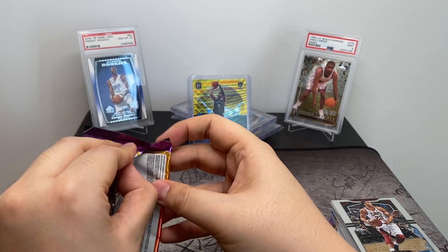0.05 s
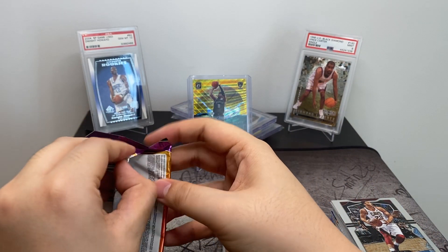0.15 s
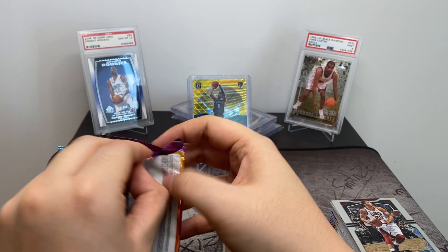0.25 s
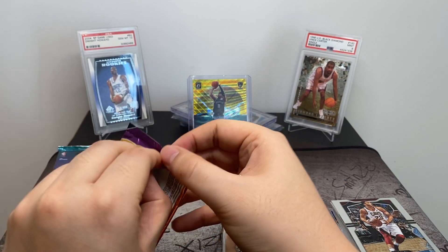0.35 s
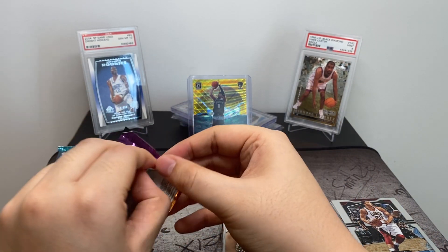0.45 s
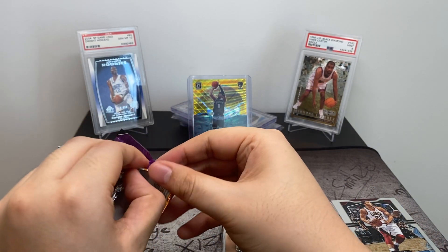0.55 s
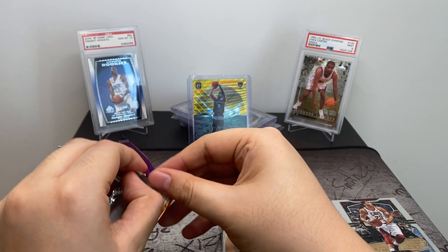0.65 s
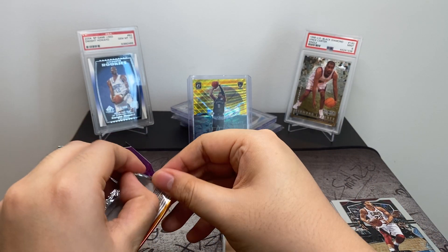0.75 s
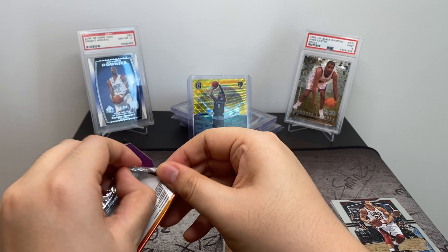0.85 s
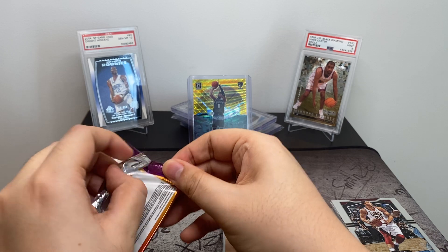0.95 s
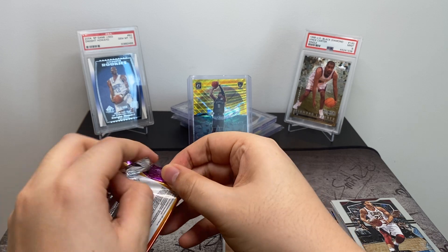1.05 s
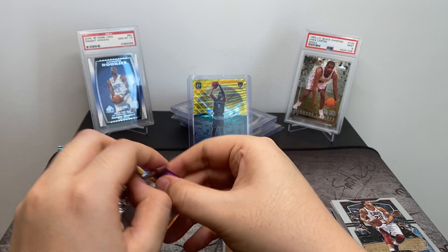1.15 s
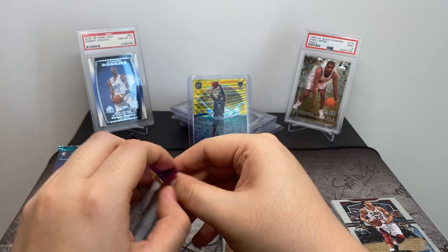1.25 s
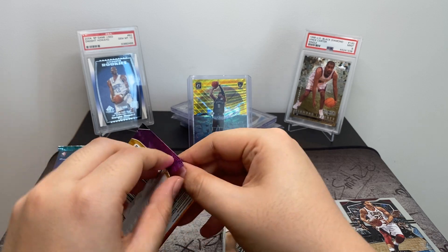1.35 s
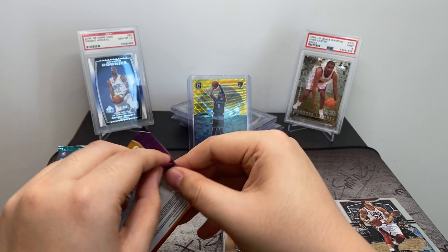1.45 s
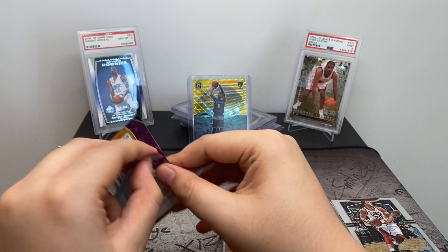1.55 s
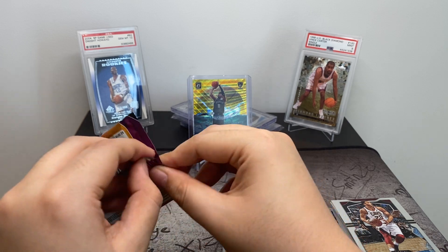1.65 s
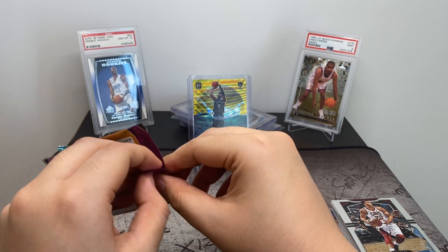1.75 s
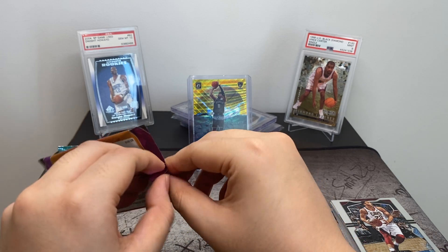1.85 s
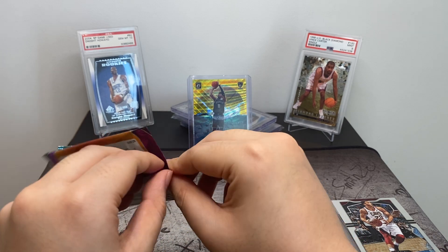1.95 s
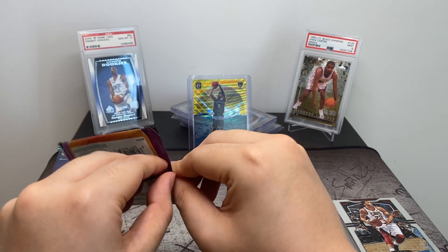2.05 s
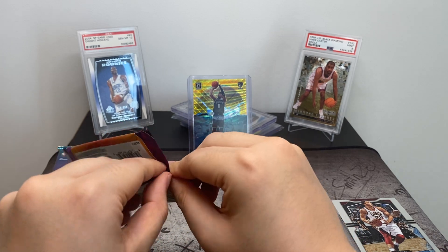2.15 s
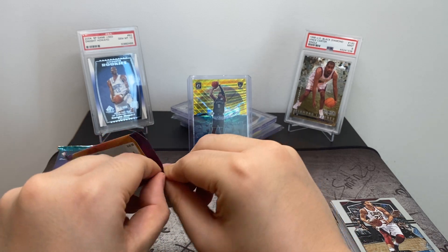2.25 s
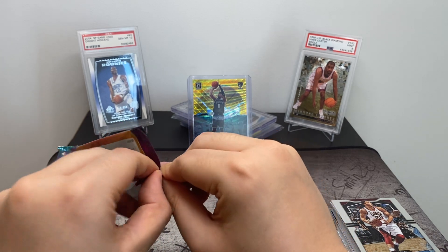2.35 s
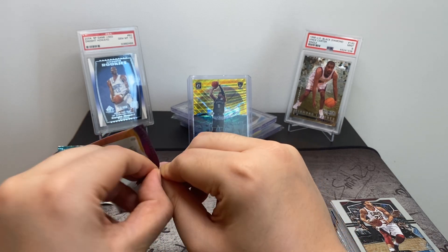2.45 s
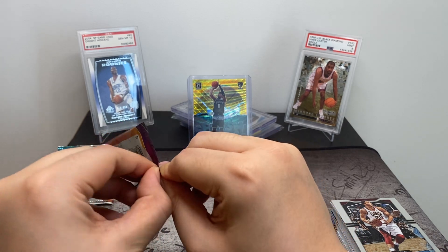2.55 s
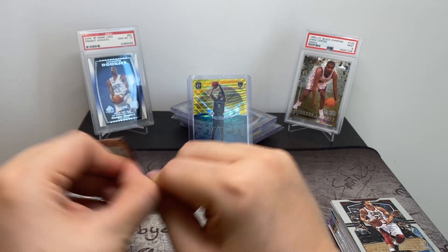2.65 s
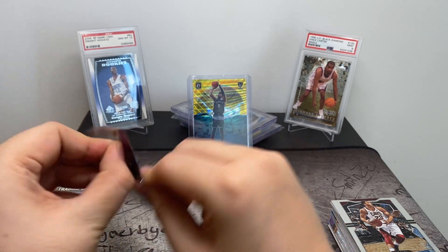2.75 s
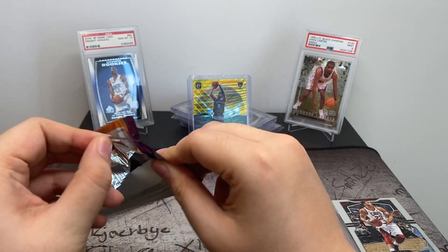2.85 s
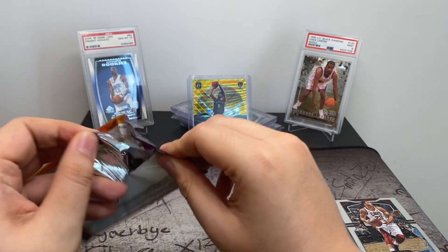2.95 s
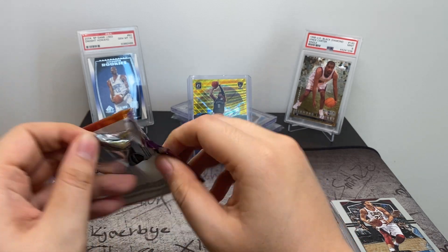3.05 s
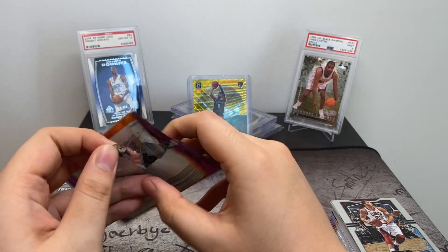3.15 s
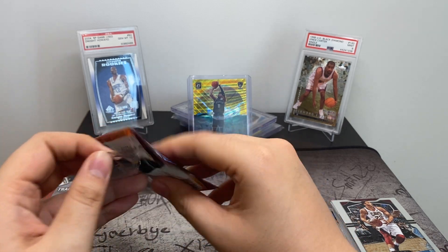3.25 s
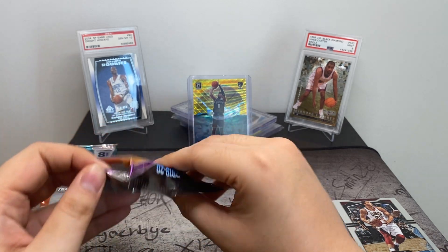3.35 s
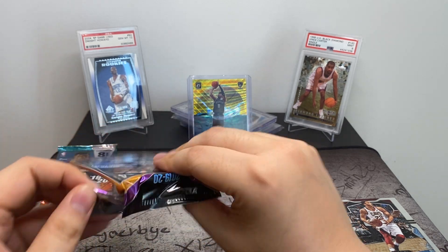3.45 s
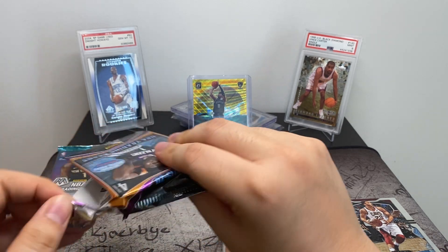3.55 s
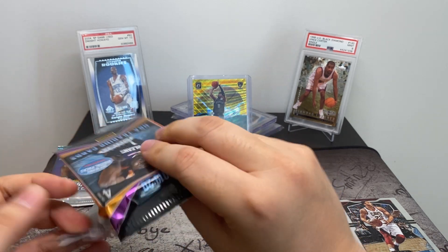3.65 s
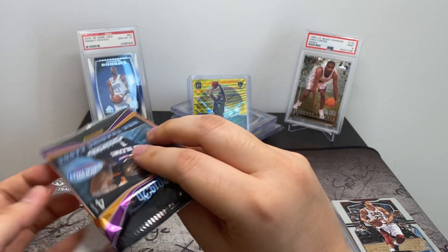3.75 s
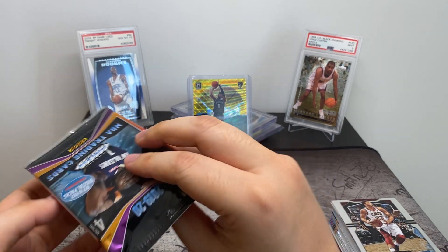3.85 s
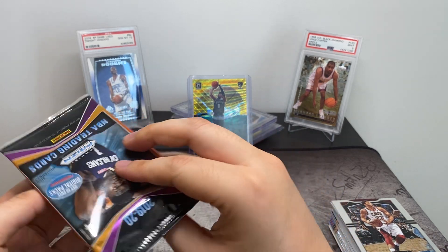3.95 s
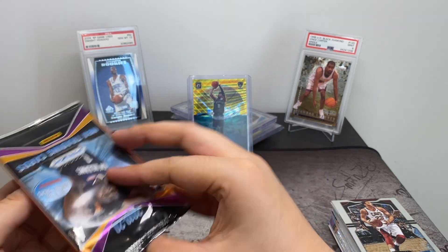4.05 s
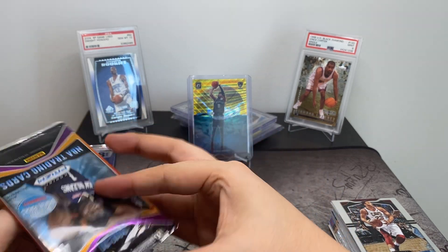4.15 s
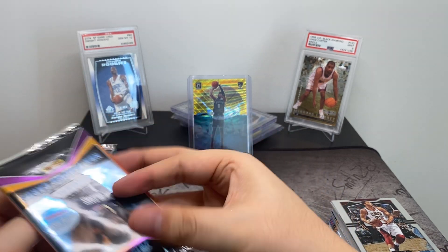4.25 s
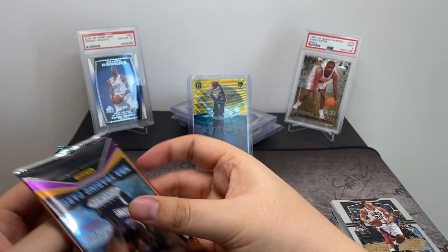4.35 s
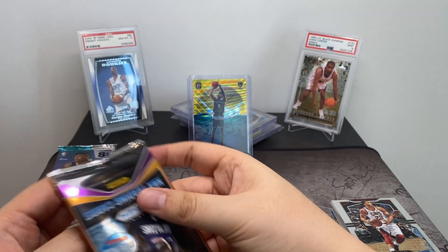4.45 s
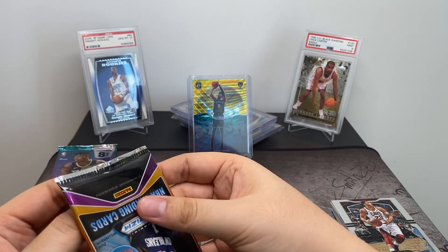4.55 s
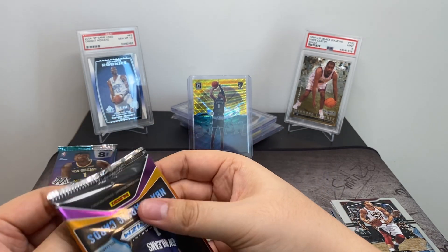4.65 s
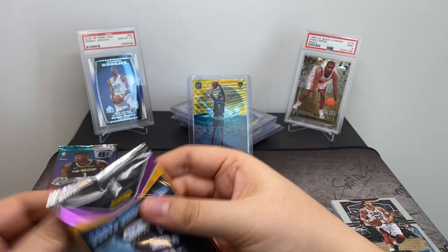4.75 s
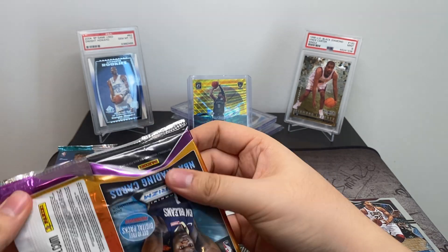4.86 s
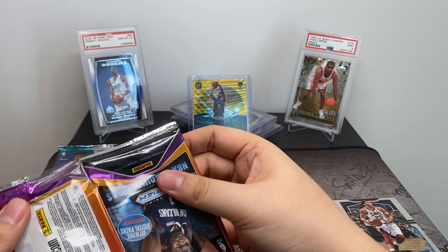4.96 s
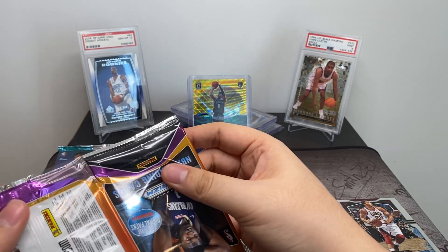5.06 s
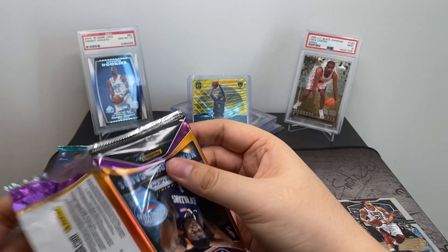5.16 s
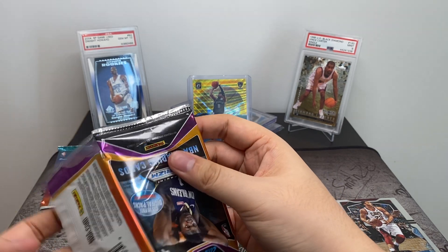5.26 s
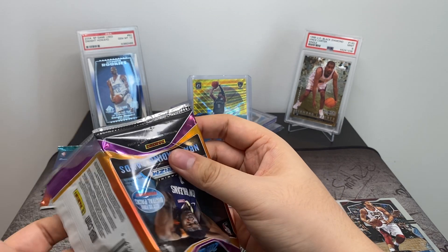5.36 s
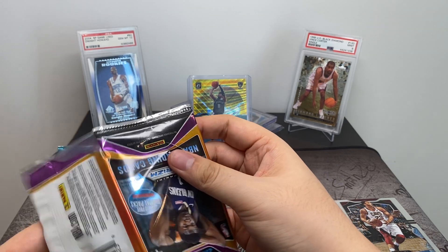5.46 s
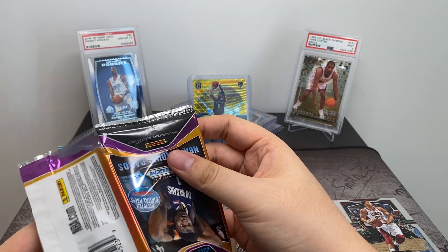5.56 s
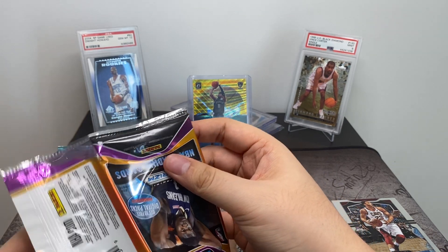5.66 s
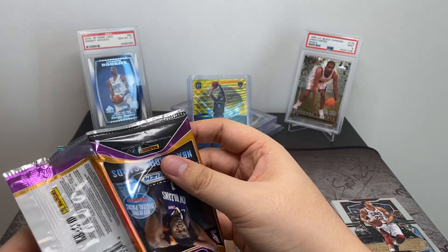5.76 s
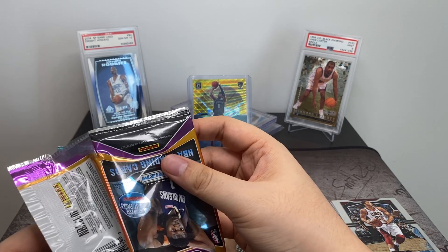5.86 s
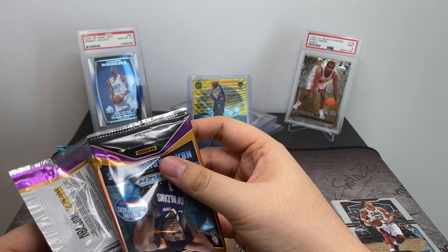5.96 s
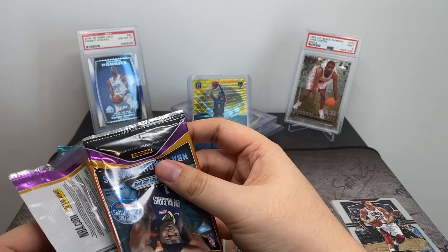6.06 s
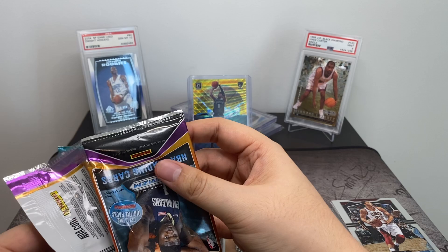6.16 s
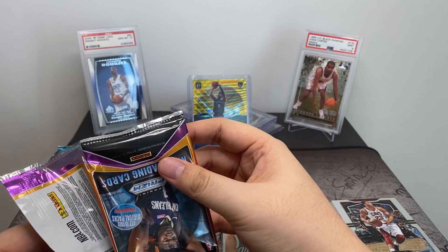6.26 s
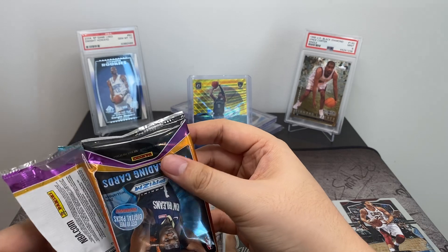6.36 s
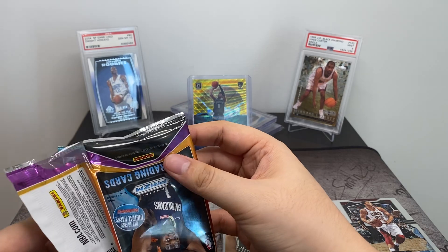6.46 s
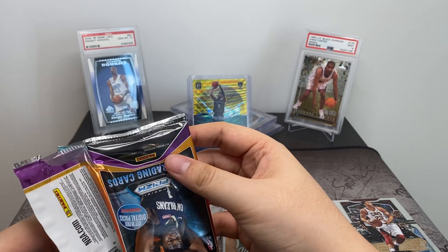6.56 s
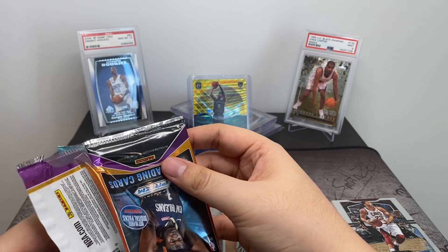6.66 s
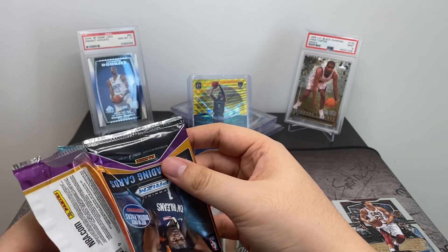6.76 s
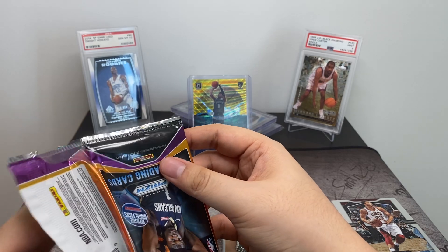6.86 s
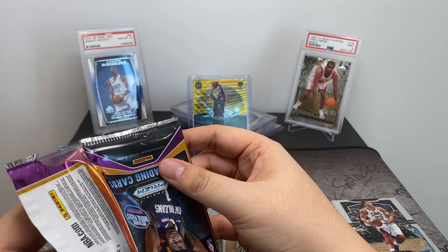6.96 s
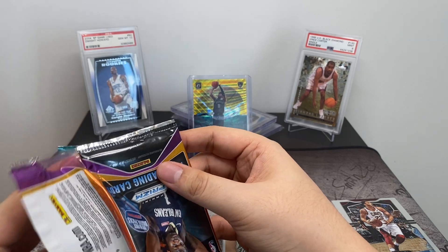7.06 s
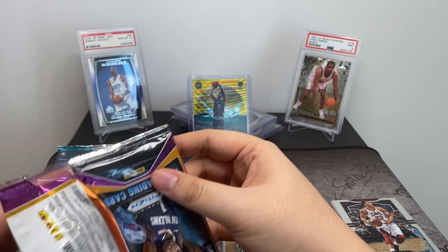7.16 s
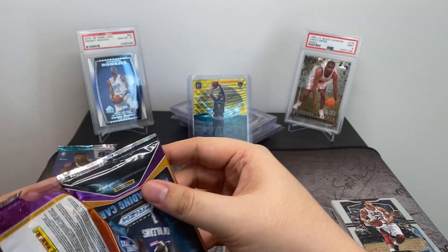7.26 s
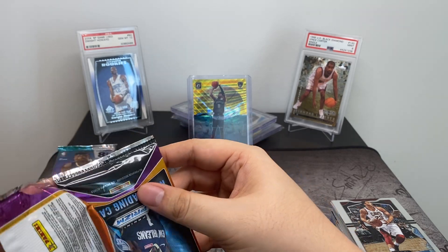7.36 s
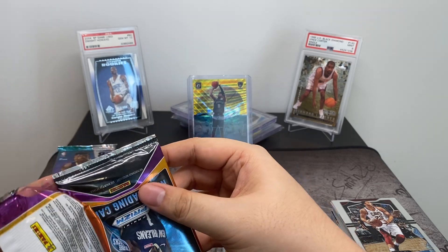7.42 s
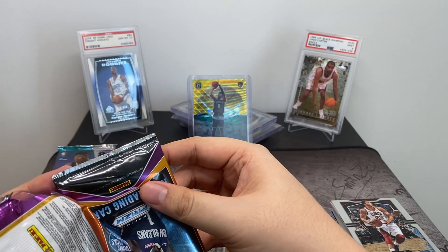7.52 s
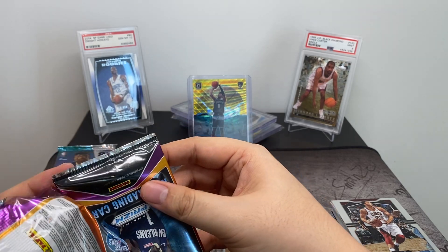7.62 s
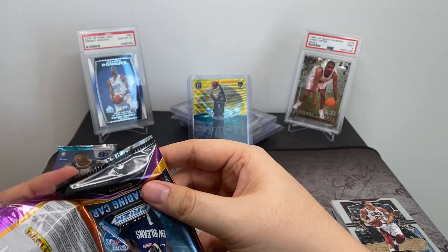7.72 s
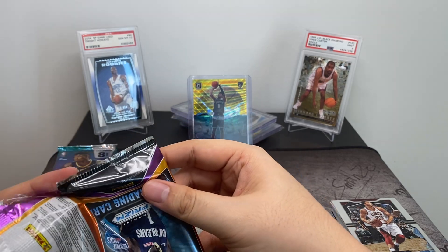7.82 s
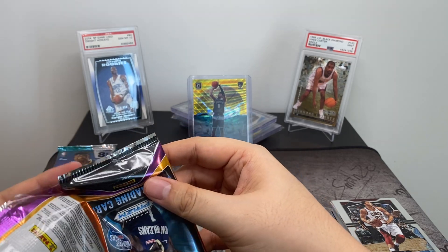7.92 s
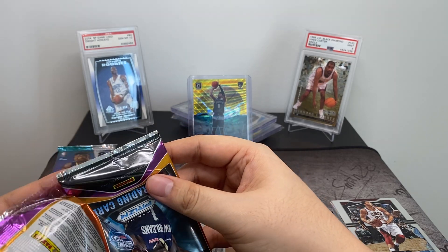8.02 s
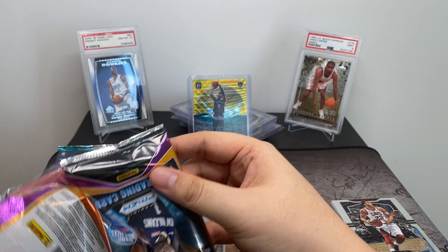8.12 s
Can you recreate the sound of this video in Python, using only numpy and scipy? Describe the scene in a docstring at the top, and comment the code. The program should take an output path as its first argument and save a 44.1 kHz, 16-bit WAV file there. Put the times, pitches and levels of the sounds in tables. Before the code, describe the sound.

Close foil packet crackling in uneven bursts, with sharp crease snaps, short bright seam rips, dull panel pops and soft thumps in a quiet room.

```python
"""A faint crackle over quiet air and a low hum, then creases snapping: hands open a foil card pack, close by.
Each stroke of the fingers sets off clumps of tiny coloured clicks; larger creases snap one by one.
The seam rips in fast runs of bright breaks, fingertips hiss along the foil and broad panels pop dully.
The pouch's resonances give a hollow body, and low damped swings thump softly from 4.9 s on.
The walls add a short diffuse tail to the foil; the stereo ports hear it at different levels and phases."""
import sys
import numpy as np
from scipy import signal
from scipy.fft import rfft, irfft, next_fast_len
from scipy.io import wavfile
from scipy.ndimage import uniform_filter1d, map_coordinates

SR = 44100
rng = np.random.default_rng(int(sys.argv[2]) if len(sys.argv) > 2 else 0)


def pcm_store(signal):
    """Save signal as 16-bit PCM."""
    levels = np.round(np.clip(np.atleast_2d(signal), -1, 1) * 32767)
    wavfile.write(sys.argv[1], SR, levels.astype(np.int16).T)


N = 361179

# fingers sliding smoothly on the foil: start_s, length_s, level_db (hiss at the top of the swell)
FINGER_SLIDES = [(4.135, 0.075, -44.5), (6.602, 0.092, -49.5), (6.616, .016, -50), (6.753, 0.025, -50.5),
                 (6.894, .07, -53)]
# the two ports hear the foil through different paths: freq_hz, left_lead_rad
PORT_PHASE = [(200, 0), (1700, 2), (3000, 4), (4600, 5.5), (6700, 7), (8000, 4), (10500, 0.06),
              (13200, -2.5), (15700, -9)]


def amp(db):
    """Decibels to gain."""
    return 10 ** (np.asarray(db) / 20)


def unit(x):
    """Scales to rms 1."""
    return x / np.sqrt(np.mean(x ** 2) + 1e-20)


def read(points, hz):
    """Reads a spectrum table on a log-frequency axis."""
    f, value = np.transpose(points)
    return np.interp(np.log(hz + 1), np.log(f), value)


def add(mix, s, sound):
    """Adds a sound to the mix at time s."""
    part = mix[:, max(round(s * SR), 0):][:, :sound.shape[-1]]
    part += sound[..., :part.shape[-1]]


def causal(gain):
    """Gives a magnitude curve the phase of a body that rings only after it is struck."""
    log_gain = np.log(np.maximum(np.r_[gain, gain[-2:0:-1]], 1e-4))
    return np.exp(np.conj(signal.hilbert(log_gain)))[:len(gain)]


def port_paths(hz):
    """Phase turns from the foil to the left and right ports; the right one is the reference."""
    return np.exp(1j * read(PORT_PHASE, hz) * np.array([[1], [0]]))


def background(mono_hz=450, hum_hz=52.8, hum_width_hz=6, whine_hz=908, whine_width_hz=25,
               air_db=-53, hum_db=-60, whine_db=-79):
    """Steady room air, alike in both ports in the bass, with a wavering low hum and a faint whine."""
    # colour of the room air: freq_hz, relative_db
    air_colour = [(27, -47.5), (40, -14.5), (60, 0.5), (90, -19.5), (130, -15), (600, -38), (930, -31.5),
                  (1250, -42), (1900, -49.5), (16000, -63.5)]
    hz = np.fft.rfftfreq(N, 1 / SR)
    shared, left, right, drone = rfft(rng.standard_normal((4, N)))
    same = 1 / (1 + (hz / mono_hz) ** 2)
    stereo = np.sqrt(same) * shared + np.sqrt(1 - same) * np.array([left, right])
    air = irfft(stereo * amp(read(air_colour, hz)), N)
    # noise in a narrow band wavers by itself
    hum = irfft(drone / (1 + ((hz - hum_hz) / hum_width_hz) ** 2) ** 2, N)
    whine = irfft(drone / (1 + ((hz - whine_hz) / whine_width_hz) ** 2) ** 2, N)
    return amp(air_db) * unit(air) + amp(hum_db) * unit(hum) + amp(whine_db) * unit(whine)


def room(x, tail_db=-10, slope_db=-2.0, build_s=0.0081):
    """A diffuse tail builds up from the walls, weaker in the treble."""
    # room decay: freq_hz, t60_s
    decay = [(300, 0.18), (4000, 0.28), (15000, 0.21)]
    hz, t, z = signal.stft(rng.standard_normal((2, SR // 2)), SR, nperseg=256)
    z = z * amp(-60 * t / read(decay, hz)[:, None]) * (1 - np.exp(-t / build_s))
    wet = amp(tail_db + slope_db * np.log2(1 + hz / 2000))[:, None]
    flat, tail = signal.istft(np.array([z, z * wet]), SR)[1]
    # the unattenuated tail sets the scale, so wet is relative to the direct sound
    tail = tail / np.linalg.norm(flat[0])
    return x + signal.oaconvolve(x, tail, axes=1)[:, :N]


def thumps(swell_s=.014):
    """The stack of cards shifts in the pouch: a few low, quickly damped swings."""
    # soft thumps: start_s, level_db (envelope peak), pitch_hz
    card_shifts = [(4.902, -36, 81), (5.235, -36.5, 89.5), (5.29, -33, 116), (5.486, -39.5, 116),
                   (5.529, -39.5, 96)]
    out, t = np.zeros((2, N)), np.arange(SR // 4) / SR
    swell = (t / swell_s * np.exp(1 - t / swell_s)) ** 2
    for s, db, hz in card_shifts:
        add(out, s, amp(db) * swell * np.sin(2 * np.pi * hz * t))
    return out


def foil_bands(low_hz=1450, high_hz=7000, size=2048):
    """Impulse responses of the foil, with the pouch's resonances on its colour: hollow body, mids and treble."""
    # colour of the foil: freq_hz, relative_db
    foil_colour = [(50, -29.5), (210, -1), (340, -2.5), (700, -2.5), (3000, 6.5), (5000, 5), (9500, 4.5),
                   (13400, -5), (15200, -4), (17000, -16.5)]
    # resonances of the pouch over the table: freq_hz, width_hz, boost_db
    pouch_modes = [(339, 180, 5.5), (657, 116, 6.5), (1007, 370, 8), (2290, 510, 3.5)]
    hz = np.fft.rfftfreq(size, 1 / SR)
    modes_db = sum(db / (1 + (2 * (hz - f) / width) ** 2) for f, width, db in pouch_modes)
    colour = amp(read(foil_colour, hz) + modes_db)
    low, high = (1 / (1 + (hz / edge) ** 8) for edge in (low_hz, high_hz))
    shares = low, (1 - low) * high, 1 - high
    return [irfft(causal(colour * np.sqrt(share))) for share in shares]


def facet(crack_s=0.00022, ring_s=0.0094, ring_db=-15, colour_db=5, colour_hz=700, size=512):
    """One facet flips: a very short crack and a scattered flutter, both coloured by its own resonances."""
    t, hz = np.arange(size) / SR, np.fft.rfftfreq(size, 1 / SR)
    crack = rng.standard_normal(size) * (t / crack_s) ** 2 * np.exp(-t / crack_s) * 2
    onset = 1 - np.exp(-(t / crack_s / 2) ** 2)
    flutter = amp(ring_db) * rng.standard_normal((2, size)) * np.exp(-t / ring_s) * onset
    # every facet has another size and shape: broad random peaks and valleys
    colour_curve = np.interp(hz / colour_hz, np.arange(size), rng.standard_normal(size))
    colour = causal(amp(colour_db * colour_curve))
    return irfft((rfft(crack) * port_paths(hz) + rfft(flutter)) * colour)


def reshape(x, depth_db, drift_s, patch_hz, size=256):
    """The sheet keeps changing shape, so its resonances rise, shift and fade: random gains over time and pitch."""
    overlap = size * 3 // 4
    hz, t, z = signal.stft(x, SR, nperseg=size, noverlap=overlap)
    place = np.array(np.meshgrid(hz / patch_hz, t / drift_s, indexing="ij"))
    patches = unit(map_coordinates(rng.standard_normal((size, size)), place, order=1, mode="wrap"))
    gain = unit(amp(depth_db * np.clip(patches, -2, 2)))
    return signal.istft(z * gain, SR, nperseg=size, noverlap=overlap)[1][:, :N]


def slides(rough_db=3.5, rough_s=0.0062):
    """Fingertips rub along the foil: a hiss that swells, catches and fades as the sheet bends under them."""
    # colour of skin rubbing on foil: freq_hz, relative_db
    rub_colour = [(200, 2), (620, 4.5), (1600, -3), (3000, -4), (5400, 3), (8000, 4.5), (11000, 0),
                  (16000, -3)]
    t, hz = np.arange(N) / SR, np.fft.rfftfreq(N, 1 / SR)
    catch = amp(rough_db * np.interp(t / rough_s, np.arange(N), rng.standard_normal(N)))
    rubbing = rfft(rng.standard_normal(N) * catch) * amp(read(rub_colour, hz))
    hiss = irfft(rubbing * port_paths(hz), N)
    hiss = reshape(hiss, depth_db=3.5, drift_s=0.019, patch_hz=358)
    swell = sum(amp(db) * np.exp(-2 * ((t - start) / length - .5) ** 2)
                for start, length, db in FINGER_SLIDES)
    return unit(hiss) * swell


def pops(body, swell_s=0.0025, width=0.77, size=2048):
    """A broad panel turns inside out: a short flutter around its own pitch, coloured by the pouch."""
    # dull pops of broad panels: start_s, peak_db (before the room), pitch_hz
    panel_pops = [(0.351, -35, 666), (2.178, -41.5, 1010), (3.712, -34.5, 460), (4.891, -25, 1040),
                  (4.903, -25.5, 358), (4.967, -30.5, 615), (5.025, -36, 625), (5.122, -32, 605),
                  (7.111, -35, 600), (7.213, -37, 915)]
    out, t, hz = np.zeros((2, N)), np.arange(size) / SR, np.fft.rfftfreq(size, 1 / SR)
    for s, db, pitch in panel_pops:
        flutter = rng.standard_normal(size) * t * np.exp(-t / swell_s)
        # width is in natural-log units of frequency
        panel = causal(1 / (1 + (np.log((hz + 1) / pitch) / width) ** 2))
        pop = irfft(rfft(flutter) * rfft(body) * panel * port_paths(hz))
        add(out, s, amp(db) * pop / abs(pop).max())
    return out


def rips(per_s=900, spread_db=4, size=1024):
    """The seam gives way in a fast, uneven run of tiny bright breaks."""
    # the seam rips a little way: start_s, length_s, level_db (rms over the length)
    seam_rips = [(0.99, 0.033, -37), (2.71, 0.037, -38), (2.797, 0.0017, -28.5)]
    # colour of the ripping seam: freq_hz, relative_db
    seam_colour = [(2500, -20), (3900, -6), (4750, 6), (6500, -1), (10500, -2), (16000, -13)]
    hz = np.fft.rfftfreq(size, 1 / SR)
    colour, out = irfft(causal(amp(read(seam_colour, hz)))), np.zeros((2, N))
    for start, length, db in seam_rips:
        run = np.zeros((2, round(length * SR) + size))
        for at in np.cumsum(rng.uniform(0.65, 1.4, size)) / per_s:
            if at < length:
                add(run, at, amp(spread_db * rng.standard_normal()) * facet(colour_db=2.5))
        run = signal.fftconvolve(run, colour[None], axes=1)
        energy = (run ** 2).mean(0).sum()
        add(out, start, amp(db) * run / np.sqrt(energy / (length * SR)))
    return out


def stroke(start, length, attack_s=0.0055, build_db=2.5, release_s=.012):
    """Gain of one stroke of the fingers: it takes hold, presses harder towards its end and lets go."""
    t = np.arange(N) / SR - start
    pressure = amp(build_db * (np.clip(t / length, 0, 1) - .5))
    outside = np.maximum(-t, 0) / attack_s + np.maximum(t - length, 0) / release_s
    return pressure * np.exp(-np.minimum(outside, 20))


def handling(grip_flex_db=-8, slide_fine_db=-5.5, slide_flex_db=-7.5):
    """Levels in dB of the fine crackle and of the flexing pouch: the steady hold plus every stroke."""
    # firmness of the hold between strokes: time_s, fine_db
    grip = [(0, -60), (.66, -75), (.72, -57), (1.2, -57), (1.95, -72.5), (2.4, -96.5), (2.9, -58.5),
            (3.65, -54.5), (3.88, -65), (4.4, -71.5), (4.73, -52.5), (5.4, -66.5), (5.72, -56.5),
            (6.001, -91.5), (6.25, -65.5), (6.83, -74), (7.15, -57), (7.38, -89), (7.5, -70), (8.15, -58)]
    # fingers squeeze or pull: start_s, length_s, fine_db (crackle), flex_db (flexing of the pouch)
    # pinching the seam, tearing from 2.68 s, turning from 3.93 s, peeling from 4.79 s, cards from 7.05 s
    squeezes = [ (0.328, 0.031, -45, -58), (0.853, 0.077, -50.5, -74), (0.925, 0.052, -42.5, -54),
                (1.246, 0.085, -43.5, -54.5), (1.577, 0.037, -51.5, -77.5), (2.683, 0.085, -37, -47.5),
                (2.845, 0.028, -40, -49), (2.902, 0.12, -45.5, -51.5), (3.13, 0.046, -43.5, -53),
                (3.245, 0.095, -46, -62.5), (3.331, 0.036, -40, -52.5), (3.415, 0.19, -46.5, -65),
                (3.524, 0.053, -33, -42), (3.666, .055, -50, -54.5), (3.932, 0.034, -47.5, -57),
                (4.442, .095, -54, -60), (4.79, 0.063, -45, -52), (4.836, 0.06, -30.5, -41),
                (4.891, 0.015, -31.5, -30), (4.946, 0.099, -55, -58), (5.101, 0.17, -50, -54.5),
                (5.273, .028, -42, -44.5), (5.459, 0.082, -43, -43.5), (5.62, 0.062, -52.5, -54),
                (5.727, 0.12, -51.5, -61.5), (7.048, 0.063, -52.5, -60), (7.198, .085, -49, -58),
                (7.492, 0.14, -57.5, -56.5), (7.738, 0.047, -46.5, -49), (7.781, 0.11, -54, -57.5)]
    hold_db = np.interp(np.arange(N) / SR, *np.transpose(grip))
    fine, flex = amp(hold_db) ** 2, amp(hold_db + grip_flex_db) ** 2
    # a slide also stirs the foil, at levels relative to its hiss
    stirred = [(start, length, db + slide_fine_db, db + slide_flex_db)
               for start, length, db in FINGER_SLIDES]
    for start, length, fine_db, flex_db in [*squeezes, *stirred]:
        power = stroke(start, length) ** 2
        fine = fine + amp(fine_db) ** 2 * power
        flex = flex + amp(flex_db) ** 2 * power
    return 10 * np.log10(fine), 10 * np.log10(flex)


def crackle(band, level_db, per_s, spread_db, rub_db, rub_hz, crowding=.6, smoothing=0.15,
            clump_db=4.5, clump_s=.016, even_s=0.055, count=200):
    """Tiny facets flip in clumps, crowding as the hands work harder; a light touch mostly hisses."""
    t, ticks = np.arange(N) / SR, np.zeros((2, N))
    effort_db = level_db - level_db.mean()
    clumps_db = clump_db * np.interp(t / clump_s, np.arange(N), rng.standard_normal(N))
    rate = per_s * amp(crowding * effort_db + clumps_db)
    size = amp(spread_db * np.minimum(rng.exponential(1, N), 3))
    facets = [facet() for _ in range(count)]
    for at in np.flatnonzero(rng.random(N) < rate / SR):
        add(ticks, t[at], size[at] * facets[at % count])
    highpass = signal.butter(2, rub_hz, "high", fs=SR, output="sos")
    hiss = signal.sosfilt(highpass, rng.standard_normal((2, N)))
    rub = amp(rub_db - smoothing * effort_db) * hiss
    sound = signal.oaconvolve(unit(ticks) + rub, band[None], axes=1)[:, :N]
    # the hands set how much energy is released in each moment
    power = uniform_filter1d((sound ** 2).mean(0), int(even_s * SR) + 1)
    return sound / np.sqrt(abs(power) + 1e-12) * amp(level_db)


def rustle(bands):
    """Small wrinkles fizz while larger panels flex the hollow pouch."""
    fine_db, flex_db = handling()
    body, mids, treble = bands
    bright = irfft(causal(np.hypot(abs(rfft(mids)), abs(rfft(treble)))))
    wrinkles = crackle(bright, fine_db, per_s=190, spread_db=7.5, rub_db=-13, rub_hz=3550)
    panels = crackle(body, flex_db, per_s=130, spread_db=2.5, rub_db=-13, rub_hz=151)
    return wrinkles + panels


def snaps(bands, body_db=6, treble_db=9, level_db=-5, lag_s=.0006, creep_db=-13, creep_s=0.0009, size=150):
    """Each large crease creeps, then flips with its own mix of body, mids and treble; the body is slower."""
    # creases that buckle: start_s, level_db (mids), body_db and treble_db (against the mids);
    # all three levels are relative, the offsets above are added to them
    creases = [(0.0905, -27.5, -42, -9), (0.1985, -30, -7.5, -19), (0.2865, -35.5, -33, -0.5),
               (0.3321, -25, -15.5, -4.5), (0.4637, -32.5, -11, -12), (0.5701, -39.5, -11, -8.5),
               (0.7035, -29, -10.5, -9.5), (0.866, -25, -39, -6), (0.8898, -22, -15.5, -15.5),
               (0.9404, -28, -25, -10), (0.9662, -25, -25, -15), (1.1309, -35, -35, -1.5),
               (1.2466, -29.5, -15, -6), (1.293, -23, -26, -9), (1.3379, -36, -11, 5.5),
               (1.7197, -19, -22, -5.5), (1.7295, -20.5, -24, -7.5), (2.146, -26.5, -21, -16),
               (2.442, -56, -3, -1), (2.5706, -26.5, -18, -14.5), (2.6636, -31, -10.5, -9),
               (2.688, -12.5, -24, -8), (2.7485, -17.5, -17, -20), (2.7543, -14.5, -44, -7),
               (2.768, -18.5, -26, -10.5), (2.8688, -16, -41, -11), (2.972, -27, -11.5, -11),
               (2.993, -22.5, -21.5, -7), (3.0101, -18, -23, -1), (3.0797, -23.5, -31, -19),
               (3.087, -27.5, -30, -5.5), (3.1364, -27, -23, -4), (3.2582, -36.5, -32, -6),
               (3.3307, -22, -29, -9), (3.4068, -22, -41, -19), (3.4505, -26, -19.5, -9.5),
               (3.5041, -20.5, -18, -9), (3.5177, -22.5, -28, -3.5), (3.5293, -26, -34, -8),
               (3.5439, -17.5, -17.5, -7.5), (3.5593, -12, -14, -9), (3.6799, -22.5, -13.5, -6.5),
               (3.9494, -30, -33, -11), (3.9693, -30.5, -3.5, -7), (4.034, -27.5, -16.5, -14),
               (4.1566, -24.5, -27, -7.5), (4.2054, -21.5, -27, -10.5), (4.288, -32.5, -18.5, -7),
               (4.4819, -26.5, -40, -8.5), (4.5216, -26, -11, -12), (4.5961, -24, -19.5, -12),
               (4.6011, -19.5, -20.5, -15), (4.611, -19, -23.5, -11), (4.7087, -26.5, -20, -5.5),
               (4.7402, -26, -16.5, -4.5), (4.7689, -10.5, -19.5, -11), (4.7786, -11.5, -25, -12),
               (4.815, -16.5, -17, -7), (4.8216, -18, -12, -15), (4.837, -19, -27, -16),
               (4.8474, -16.5, -9, -10), (4.8536, -15.5, -1.5, -14), (4.8618, -16.5, -4, -4),
               (4.9035, -13, -3, -11), (5.0203, -30, -7, -6.5), (5.1951, -27, -11, -14),
               (5.2723, -20.5, -13, -10.5), (5.2828, -18.5, -7.5, -8), (5.4677, -24, -3.5, -6),
               (5.4922, -29, 2.5, -10), (5.5202, -25, -7, -19), (5.6662, -15.5, -12.5, -11),
               (5.8415, -22.5, -20.5, -8), (6.2073, -31, -23, -15), (6.3447, -30.5, -12.5, -8.5),
               (6.4415, -30.5, -22, -8), (6.482, -35, -8.5, -13), (6.8755, -45, -12, 2),
               (7.084, -33, -5.5, 0.5), (7.2278, -25.5, -32, -7), (7.2714, -18.5, -11, -4),
               (7.4448, -38, -17, 1), (7.5309, -30.5, -12.5, -11), (7.6293, -37, -17, -28),
               (7.7565, -14, -9.5, -19.5), (7.8277, -35.5, -8, -1.5), (8.011, -36.5, -21, -0.5),
               (8.1829, -36.5, -17, -2)]
    out = np.zeros((2, N))
    for s, db, body, treble in creases:
        flip, flex = facet(colour_db=2.5), facet(crack_s=0.00072, colour_db=0.5)
        low, mids, high = (signal.fftconvolve(source, band[None], axes=1)
                           for source, band in zip((flex, flip, flip), bands))
        mids = unit(mids)
        snap = amp(body + body_db) * unit(low) + mids + amp(treble + treble_db) * unit(high)
        # the first few milliseconds of the mids set the loudness
        onset = np.sqrt(np.mean(mids[:, :size] ** 2))
        snap = amp(db + level_db) * snap / onset / 2
        add(out, s + lag_s, snap)
        # the creep is a faint copy just ahead of the flip
        add(out, s + lag_s - creep_s * rng.uniform(1, 2.6), amp(creep_db) * snap)
    return out


def scene():
    """The foil in its room, nearer the left port over most of the spectrum, with thumps and background."""
    # stereo balance of the foil: freq_hz, left_minus_right_db
    balance = [(150, -1), (450, 3.5), (5500, 6), (8000, 0.5)]
    bands = foil_bands()
    foil = room(snaps(bands) + rustle(bands) + rips() + slides() + pops(bands[0]))
    size = next_fast_len(N)
    lean = amp(read(balance, np.fft.rfftfreq(size, 1 / SR)) * np.array([[.5], [-.5]]))
    # the lean keeps the mean power gain of the two ports at 1
    lean = lean / np.sqrt((lean ** 2).mean(0))
    foil = irfft(rfft(foil, size) * lean, size)[:, :N]
    return foil + thumps() + background()


def record(dry, edge_hz=16850):
    """The recorder's band limit: a steep lowpass."""
    lowpass = signal.firwin(255, edge_hz, window=("kaiser", 9), fs=SR)
    return signal.oaconvolve(dry, lowpass[None], "same")


dry = scene()
out = record(dry)
pcm_store(out)
```